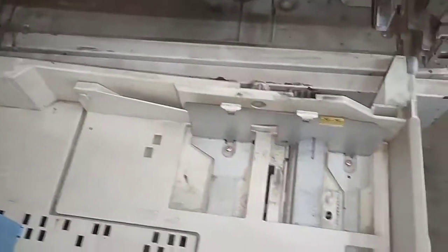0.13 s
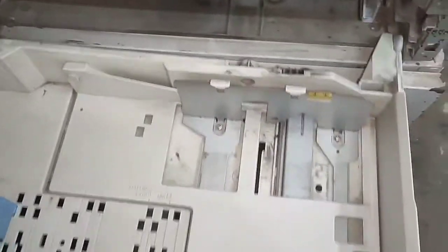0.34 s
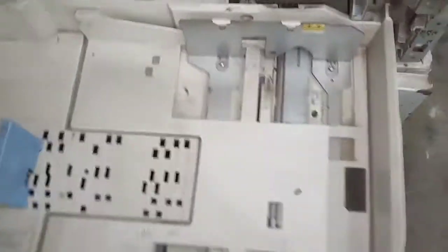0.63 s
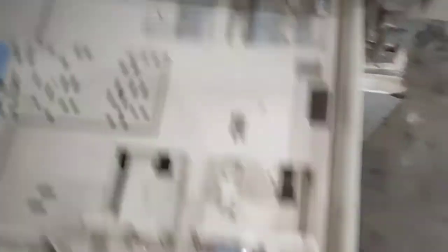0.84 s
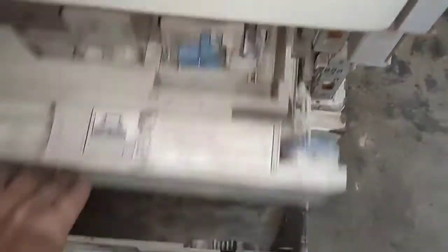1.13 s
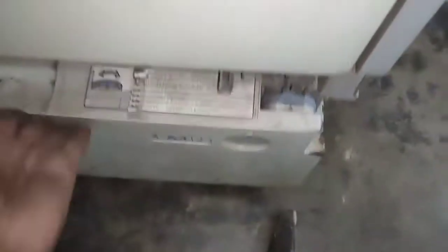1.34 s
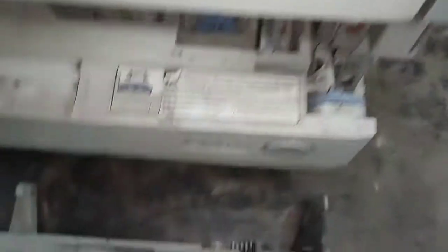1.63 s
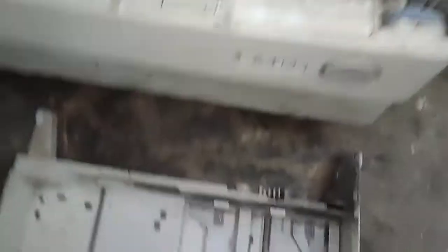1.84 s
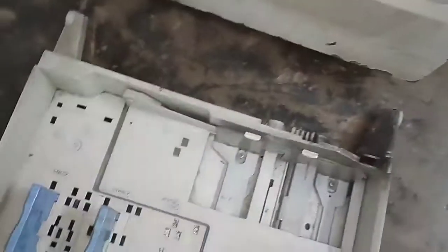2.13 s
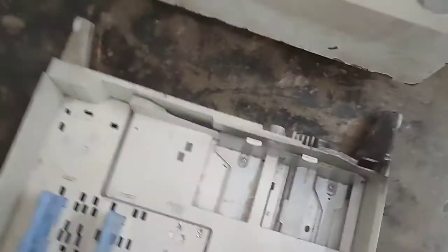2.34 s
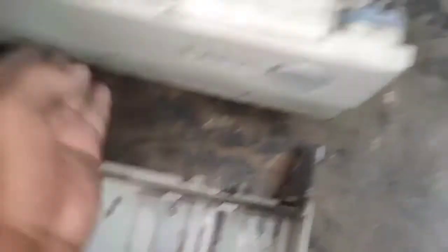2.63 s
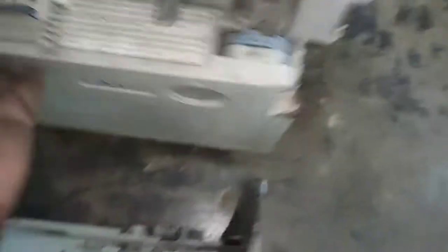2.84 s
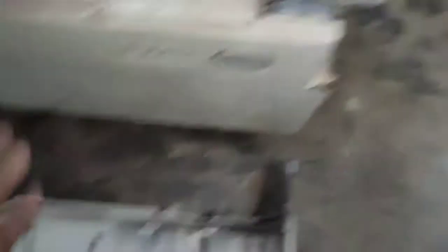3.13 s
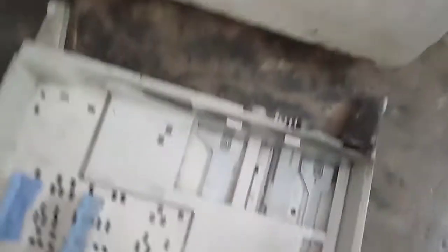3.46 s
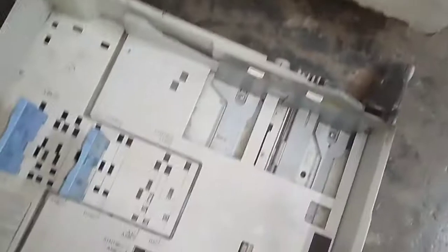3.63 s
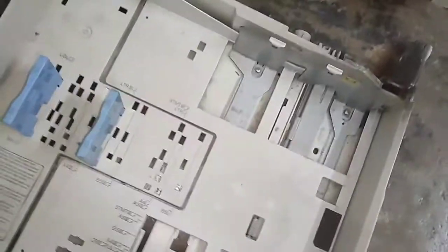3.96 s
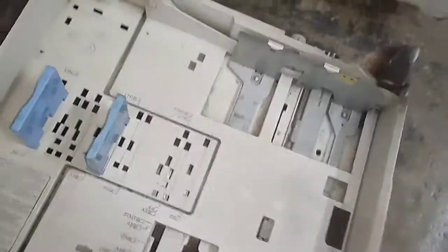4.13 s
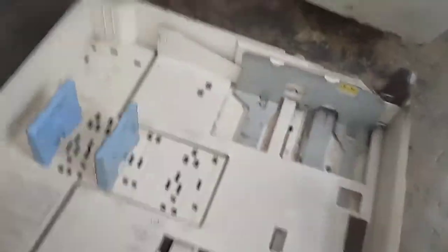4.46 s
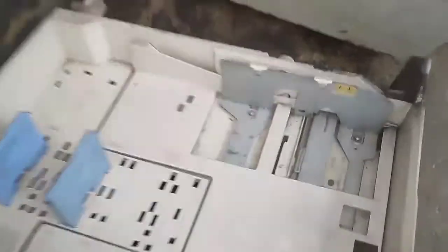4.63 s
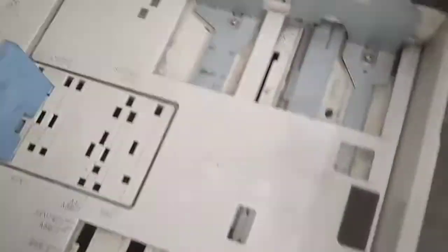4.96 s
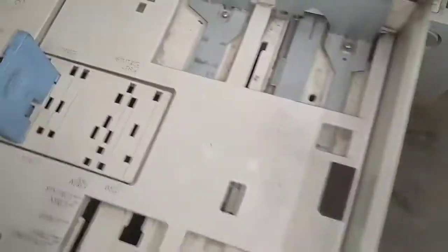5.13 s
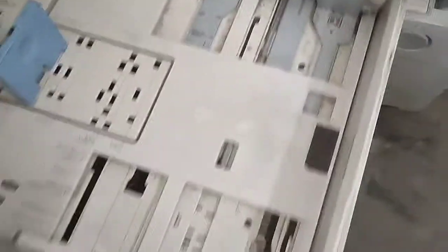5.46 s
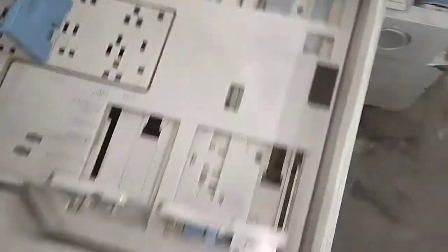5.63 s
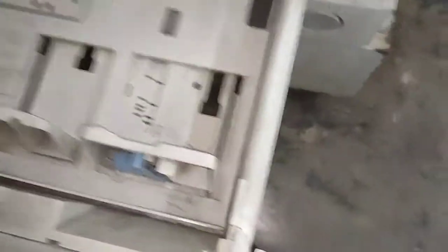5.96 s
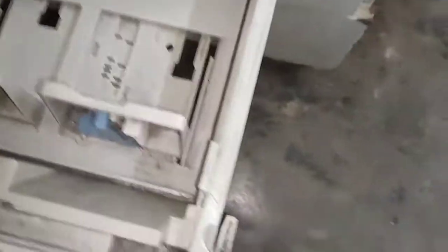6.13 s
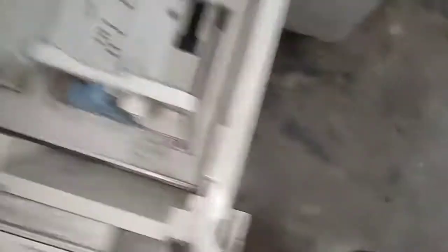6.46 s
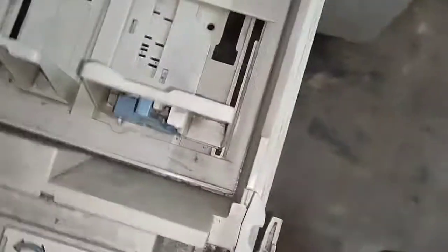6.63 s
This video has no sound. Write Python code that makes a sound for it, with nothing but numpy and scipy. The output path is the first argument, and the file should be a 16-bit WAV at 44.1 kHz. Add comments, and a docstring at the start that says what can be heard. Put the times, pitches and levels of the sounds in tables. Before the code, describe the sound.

A plastic paper tray in a copier is handled close to a hand-held phone. For the first 1.4 seconds it slides with a gritty scrape, quick clicks and hollow knocks, the hardest at about 1 second. A lull follows, with a faint squeak and soft bumps. At 2.8 seconds a hard knock lands with a short shove that fades away. From 3.6 seconds lighter handling brings bumps, clicks and some rubbing. The runners give a few faint, short squeaks between 4.5 and 5 seconds. At 5.1 seconds loud knocks and scraping shoves resume, clattering until about 5.8. More knocks and a short scrape come from 6.2 to 6.5, and the tray goes home with sharp clacks at 6.7 seconds. The sound has little bass, with a short room echo over a faint, even workshop background.

```python
"""Plastic paper cassettes in a workshop copier, close to a hand-held phone.
To 1.4 s a tray slides and knocks: stick-slip clicks and harder blows ring its hollow body.
A lull with soft bumps follows, then a hard knock at 2.8 s and more handling from 3.6 s.
The runners squeak from 4.5 s; loud knocks and shoves resume at 5.1 s, and the tray goes home at 6.7 s.
The room answers throughout, over a faint workshop background."""
import sys
import numpy as np
from scipy import signal
from scipy.fft import rfft, irfft, next_fast_len
from scipy.io import wavfile
from scipy.ndimage import uniform_filter1d, map_coordinates

SR = 44100
rng = np.random.default_rng(int(sys.argv[2]) if len(sys.argv) > 2 else 0)


def wav_out(sig):
    """Save sig, one row per channel (or a flat mono array), as 16-bit PCM at SR to the path in sys.argv[1]."""
    wavfile.write(sys.argv[1], SR, np.round(np.clip(np.atleast_2d(sig).T, -1, 1) * 32767).astype(np.int16))


N = 299880
TIME_S = np.arange(N) / SR
FFT_SIZE = next_fast_len(N + SR)
HZ = np.maximum(np.arange(FFT_SIZE // 2 + 1) * SR / FFT_SIZE, 1)
BODY_TOP_HZ, WALL_TOP_HZ = 1300, 4500  # three bands: body, walls, rasp

# Knocks on the tray: start_s, wall_db, body_re_wall_db, rasp_re_wall_db, pitch_hz
KNOCKS = [(0.0106, -21.5, -10, -3, 964), (0.0561, -19.5, -10, -13, 1010), (0.093, -23.5, -9, -1, 1020),
          (0.157, -21.5, -14, -21, 1020), (0.3345, -18.5, -8.5, -11, 1010), (0.4127, -12.5, -15, -5, 830),
          (0.447, -18, -8, 2.5, 710), (0.4773, -17, -12, -4, 836), (0.6162, -18, -22, -37, 1070),
          (0.654, -20, -13, -25, 970), (0.7055, -24, -22, 0, 830), (0.786, -24.5, 1, -0.5, 725),
          (0.814, -17.5, -9, -4.5, 770), (0.854, -18.5, -6, -6, 875), (0.901, -31, 7.5, 9.5, 814),
          (0.923, -35.5, 10.5, 11, 830), (1.027, -7.5, -9.5, -8, 980), (1.1693, -13.5, -28, 2, 784),
          (1.1959, -16, -6, -23, 920), (1.3265, -27, -9.5, 0.5, 785), (1.359, -25, -1.5, 1, 890),
          (1.413, -33.5, 5, 9.5, 990), (1.722, -54, -2, -5, 630), (1.9576, -63, 6, 11, 426),
          (2.0569, -52.5, 8, 5, 433), (2.1867, -48, 2, 2, 362), (2.6359, -50.5, 9.5, -12, 775),
          (2.7513, -23, -25, 1.5, 730), (2.799, -13, -18, -12, 1260), (2.813, -9.5, -7, -2, 970),
          (3.58, -55.5, 10.5, 13.5, 396), (3.663, -34, -4, -5, 430), (3.803, -50, 11, -8, 840),
          (3.856, -28.5, -3, -26, 435), (3.98, -38.5, 10.5, 0, 474), (4.022, -25.5, -2, -27, 930),
          (4.038, -28, -7, -6, 790), (4.0642, -24, -8, -25, 880), (4.0991, -23.5, -13, -12, 473),
          (4.128, -28.5, -11, 2.5, 490), (4.324, -25.5, -2.5, 8.5, 870), (4.366, -43, 9, 13, 920),
          (5.0777, -10, -9.5, 2, 1100), (5.1298, -12.5, -10, 6.5, 865), (5.159, -34, -12, -7, 880),
          (5.216, -18, -27, -7, 467), (5.2884, -16, -16, 1.5, 466), (5.365, -20.5, -12, -7, 460),
          (5.4109, -17, -5.5, -26, 1040), (5.4245, -17.5, -7, -3, 830), (5.462, -20, -10, 2, 492),
          (5.4966, -21, -8.5, 5.5, 356), (5.522, -28, -19, 6, 510), (5.6858, -17, -15, -4, 1080),
          (5.7125, -27, 3, -5, 800), (5.7386, -11.5, -8, -7, 490), (5.777, -17, -12, 3, 890),
          (6.162, -59, -10, 15, 400), (6.2129, -15.5, -9, -7.5, 367), (6.22, -16.5, -8, -4.5, 840),
          (6.3278, -20, -12, -5.5, 890), (6.368, -25, -1, 3, 856), (6.426, -26, 0, -28, 834),
          (6.497, -47, -3, 6, 860), (6.6338, -29.5, -9, -8, 1230), (6.7024, -15, -26, 1, 940),
          (6.7144, -9.5, -1.5, -11, 853), (6.7468, -7.5, -20, -3.5, 910)]


def tray():
    """Stick-slip contact force, heard as broadband grit and through the tray's modes."""
    contact = grit(rate_hz=3500, scatter_db=1.6, rub_gain=0.89) * np.hypot(sliding(), knocking())
    return overall_tone(contact) + tray_modes(contact)


def overall_tone(contact):
    """Overall tone of the tray as heard through the phone's microphone; one force per band."""
    # Tone through the microphone: freq_hz, density_db
    colour = [(200, -19.5), (250, -16.5), (330, -2), (373, -6.5), (460, -1.5), (674, -8.5), (890, -1.5),
              (1280, -12), (2130, -14.5), (4120, -26.5), (4650, -29), (7060, -14), (11700, -26.5),
              (14900, -25.5), (16000, -18)]
    body = 1 / (1 + (HZ / BODY_TOP_HZ) ** 6)
    rasp = 1 / (1 + (WALL_TOP_HZ / HZ) ** 8)
    bands = body, 1 - body - rasp, rasp
    return 0.97 * sum(filtered(force, unit(spectrum(colour) * band))
                      for force, band in zip(contact, bands))


def tray_modes(contact):
    """Hollow resonances whose shares shift as the contact moves; blows ring the body modes."""
    # Tray modes: freq_hz, width_hz, gain_db
    modes = [(320, 80, -9), (359, 120, -6), (404, 55, -5.5), (460, 72, 5), (506, 35, 12), (669, 56, 17.5),
             (755, 58, 15), (817, 59, 0.5), (916, 35, 10), (1000, 44, 14), (1100, 330, 8.5),
             (1485, 66, 15.5), (2050, 66, -9.5), (2150, 240, -4), (2470, 190, -7), (2970, 61, -18),
             (3500, 260, -11), (4030, 190, -4), (6700, 600, 10), (6620, 480, -6)]
    # Soft handling bumps: start_s, level_db, pitch_hz
    bumps = [(1.961, -47, 414), (1.98, -47, 412), (2.074, -44.5, 514), (2.164, -35, 360),
             (2.209, -34.5, 365), (2.225, -38.5, 423), (2.253, -39.5, 356), (3.614, -33, 414),
             (3.647, -39, 402), (3.689, -38.5, 444), (3.799, -34, 414), (3.866, -35, 435),
             (3.977, -32, 455)]
    start_s, wall_db, body_db, _, pitch_hz = np.transpose(KNOCKS)
    last = np.maximum(np.searchsorted(start_s * SR, np.arange(N)) - 1, 0)
    recency = np.exp(-np.abs(TIME_S - start_s[last]) / 0.2)
    out = 0
    for hz, width_hz, db in modes:
        band = int(hz > BODY_TOP_HZ) + int(hz > WALL_TOP_HZ)
        push = contact[band] * undb(db - 9 + 3.86 * walk(24))
        if hz < BODY_TOP_HZ:
            # rubbing near the spot last struck favours the same modes
            match = np.exp(-(np.log(hz / pitch_hz[last]) / 0.073) ** 2)
            push *= undb(15.6 * recency * match - 7)
            push += blows(start_s, wall_db + body_db + 6.5, pitch_hz, hz, width_hz, cycles=3)
            push += 2.17 * blows(*np.transpose(bumps), hz, width_hz, cycles=4.7)
        out += signal.lfilter(*signal.iirpeak(hz, hz / width_hz, fs=SR), push)
    return out


def blows(start_s, level_db, pitch_hz, mode_hz, width_hz, cycles):
    """One push per blow, strongest near the mode's pitch; it lasts some cycles, so the ring swells."""
    impulses = np.zeros(N)
    match = np.exp(-(np.log(mode_hz / pitch_hz) / 0.088) ** 2)
    impulses[(start_s * SR).astype(int)] = match * undb(level_db) * SR / (2 * np.pi * width_hz)
    return signal.lfilter(*signal.iirpeak(mode_hz, cycles, fs=SR), impulses)


def knocking():
    """Force per band of each knock: a hard first tick, then decaying chatter."""
    # Chatter decay, rows body, walls, rasp: t60_s
    chatter_t60_s = [(0.26,), (0.16,), (0.065,)]
    tick_gain, tick_s = np.vstack([0.3, 0.41, 0.66]), np.vstack([0.0011, 0.0013, 0.0029])
    power = np.zeros((3, N))
    for start_s, wall_db, body_db, rasp_db, _ in KNOCKS:
        i = int(start_s * SR)
        age_s = np.arange(min(SR // 3, N - i)) / SR
        attack = np.minimum(age_s / 0.001, 1) * (1 + tick_gain * np.exp(-age_s / tick_s))
        decay = 1000 ** (-age_s / np.array(chatter_t60_s))
        gain = undb(wall_db - 9 + np.vstack([body_db + 0.5, 0, rasp_db - 1]))
        power[:, i:i + len(age_s)] += (gain * attack * decay) ** 2
    return np.sqrt(power)


def sliding():
    """Force per band of drag plus shoves; harder contact judders more."""
    # Surges of the drag: start_s, hold_s, body_db, wall_re_body_db
    shoves = [(0.359, 0.017, -25.5, -3.5), (0.443, 0.057, -28, 2), (1.04, 0.099, -40, 2),
              (1.18, 0.029, -39.5, 11.5), (1.238, 0.0093, -29, -3.5), (1.398, 0.046, -31, 2),
              (2.75, 0.05, -53, 15), (2.814, 0.038, -22.5, 0), (2.92, 0.066, -34, -5),
              (3.869, 0.021, -35.5, -9.5), (3.98, 0.0071, -37.5, -6.5), (4.05, 0.098, -32, -5),
              (4.335, 0.015, -40.5, -1.5), (5.136, 0.0035, -21, 2), (5.239, 0.084, -24.5, -5.5),
              (5.44, 0.013, -25.5, -3.5), (5.715, 0.017, -20, 4), (5.756, 0.01, -22.5, 3.5),
              (6.243, 0.029, -30, -2.5), (6.439, 0.015, -31, -6), (6.725, 0.0086, -27.5, -1.5),
              (6.752, 0.014, -30.5, 6.5)]
    rise_db_per_s, fall_db_per_s = 360, 216
    judder_from_db, judder_span_db = -46, 19
    power = drag() ** 2
    for start_s, hold_s, body_db, wall_db in shoves:
        span = slice(int((start_s - 0.25) * SR), int((start_s + hold_s + 0.4) * SR))
        age_s = TIME_S[span] - start_s
        drop_db = rise_db_per_s * np.maximum(-age_s, 0) + fall_db_per_s * np.maximum(age_s - hold_s, 0)
        power[:, span] += band_gains(body_db - drop_db, wall_db) ** 2
    grip = np.clip((10 * np.log10(power[0]) - judder_from_db) / judder_span_db, 0.3, 1)
    judder_db = 2 * grip * walk(40)
    rattle_db = np.vstack([0, 1, 2.5]) * grip * walk(110)  # loose parts, mostly treble
    return np.sqrt(power) * undb(judder_db + rattle_db - 3.5)


def drag():
    """Slow friction force of the tray on its runners, per band."""
    # Drag curve: time_s, body_db, wall_re_body_db
    slide = [(0.0, -39.5, -4), (0.191, -37.5, -4.5), (0.3, -50.5, -3), (0.57, -36.5, -3.5),
             (0.76, -36, 3.5), (0.93, -36.5, 8.5), (1.15, -34, -1), (1.31, -52, 2), (1.59, -53, -5),
             (1.89, -66, 0.5), (2.21, -58.5, 1), (2.4, -68, -0.5), (2.62, -72, -3), (3.09, -49.5, -10.5),
             (3.52, -60.5, -2), (3.75, -54, 1), (4.3, -44, -2.5), (5.07, -46.5, -2.8), (5.2, -44, 7),
             (5.66, -31.5, -3.5), (5.98, -47, -4.5), (6.2, -54.5, -7), (6.3, -34, -5), (6.55, -47.5, -4.5),
             (6.8, -58.5, -2)]
    time_s, body_db, wall_db = np.transpose(slide)
    return band_gains(np.interp(TIME_S, time_s, body_db), np.interp(TIME_S, time_s, wall_db))


def band_gains(body_db, wall_re_body_db):
    """Body, wall and rasp gains; the rasp grows fastest as the contact hardens."""
    return undb([body_db, body_db + wall_re_body_db, body_db - 8 + 1.56 * wall_re_body_db])


def grit(rate_hz, scatter_db, rub_gain):
    """Uneven stick-slip clicks over smooth rubbing noise; rms 1."""
    slips = rng.random(N) < rate_hz / SR
    size = undb(scatter_db * np.minimum(rng.exponential(size=N), 3))
    clicks = unit(slips * size * rng.uniform(-1.276, 1, N))
    return unit(clicks + rub_gain * rng.standard_normal(N))


def hiss(corner_hz=8400):
    """High, even noise of the rubbing faces, following the drag."""
    rasp_force = drag()[2]
    return undb(-7.5) * filtered(rasp_force * rng.standard_normal(N), 1 / (1 + (corner_hz / HZ) ** 6))


def squeaks():
    """Short, slightly rough tones from the runners."""
    # Runner squeaks: start_s, length_s, pitch_hz, level_db, waver_hz
    tones = [(0.703, 0.026, 3650, -32, 25), (0.553, 0.018, 1470, -32, 25), (1.536, 0.24, 615, -53, 4),
             (4.5, 0.06, 560, -47, 8), (4.6, 0.22, 1970, -56, 70), (4.52, 0.09, 1480, -50, 14),
             (4.774, 0.094, 585, -46, 6), (4.9, 0.1, 1495, -45, 6), (4.945, 0.13, 3700, -50, 50)]
    out = np.zeros(N)
    for start_s, length_s, pitch_hz, level_db, waver_hz in tones:
        i, n = int(start_s * SR), int(length_s * SR)
        waver = walk(400)[:n]
        phase = 2 * np.pi * np.cumsum(pitch_hz + waver_hz * (waver - waver.mean())) / SR
        tone = np.sin(phase) + 0.15 * np.sin(2 * phase)
        out[i:i + n] += undb(level_db + 2 * walk(120)[:n]) * tone * signal.windows.tukey(n, 0.4)
    return out


def direct_path(source):
    """Sound reaches the right microphone port first; the lag wanders as the contact moves."""
    # Microphone ports: freq_hz, left_lead_rad, left_re_right_db
    ports = [(200, -0.92, 1.5), (700, -0.79, -6.5), (1233, -2.5, 8), (1597, -3.5, 4), (2720, -8.5, 5.5),
             (6030, -19.5, 0), (15030, -51, -2)]
    hz, lead_rad, pan_db = np.transpose(ports)
    half = undb(np.interp(HZ, hz, pan_db) / 2) * np.exp(0.5j * np.interp(HZ, hz, lead_rad))
    left, right = filtered(source, np.array([half, 1 / half]))
    left = map_coordinates(left, [np.arange(N) + 5.16 * walk(25)], order=3)
    return np.array([left, right])


def room(source, bass_t60_s=0.31, treble_t60_s=0.082, split_hz=800):
    """Reflections, different at each port in the treble; 12 tails crossfade as tray and phone move."""
    age_s = np.arange(SR // 2) / SR
    onset = np.minimum(age_s / 0.0016, 1)
    shares = np.array([undb(9.3 * walk(10)) for _ in range(12)])
    out = 0
    for weight in shares / np.linalg.norm(shares, axis=0):
        noise = rng.standard_normal((2, len(age_s)))
        low = signal.sosfiltfilt(signal.butter(1, split_hz, fs=SR, output="sos"), noise)
        bass = (low[0] + 0.067 * low[1] * np.vstack([1, -1])) * 1000 ** (-age_s / bass_t60_s)
        treble = (noise - low) * 1000 ** (-age_s / treble_t60_s)
        tail = (0.6 * bass + treble) * onset
        tail /= np.sqrt(np.sum(tail ** 2) / 2)
        out += filtered(source * weight, rfft(tail, FFT_SIZE))
    return out


def workshop():
    """Faint, wavering background noise; its bass is alike at both ports."""
    # freq_hz, density_db
    colour = spectrum([(150, -27), (250, -1.5), (420, 11), (563, -5.5), (852, -7), (1950, -24),
                       (4790, -27.5), (9390, -28.5), (15500, -35)])
    mid = filtered(rng.standard_normal(N), colour)
    side = filtered(rng.standard_normal(N), colour * np.minimum(HZ / 900, 1))
    return undb(-64 + 0.86 * walk(10.55)) * unit(np.array([mid + side, mid - side]))


def undb(db):
    """dB to gain."""
    return 10 ** (np.asarray(db) / 20)


def unit(x):
    """Scale to rms 1."""
    return x / np.sqrt(np.mean(x ** 2))


def spectrum(points):
    """Gain on the FFT grid from (freq_hz, level_db) points."""
    hz, db = np.transpose(points)
    return undb(np.interp(np.log(HZ), np.log(hz), db))


def filtered(x, gain):
    """Apply a gain on the FFT grid."""
    return irfft(rfft(x, FFT_SIZE) * gain, FFT_SIZE)[..., :N]


def walk(rate_hz):
    """Random steps, smoothed twice; rms 1."""
    hold = int(SR / rate_hz)
    steps = np.repeat(rng.standard_normal(N // hold + 1), hold)
    return unit(uniform_filter1d(uniform_filter1d(steps, hold), hold)[:N])


def scene():
    """Cassette sounds, direct and reflected, over the workshop; stereo."""
    cassette = tray() + hiss() + squeaks()
    return undb(1) * direct_path(cassette) + undb(-3.05) * room(cassette) + workshop()


def record(dry):
    """The phone cuts the bass steeply, rounds the loudest peaks and cuts the top."""
    low_cut_hz, top_hz = 224.5, 15600
    thin = signal.sosfilt(signal.cheby2(8, 25, low_cut_hz, "high", fs=SR, output="sos"), dry)
    rounded = 1.1 * np.tanh(thin / 1.1)
    return signal.sosfilt(signal.ellip(10, 0.2, 90, top_hz, fs=SR, output="sos"), rounded)


dry = scene()
out = record(dry)
wav_out(out)
```